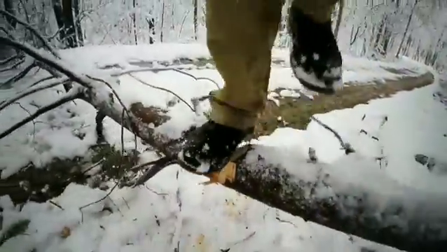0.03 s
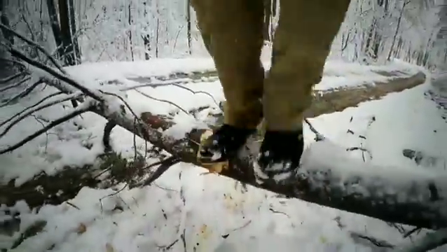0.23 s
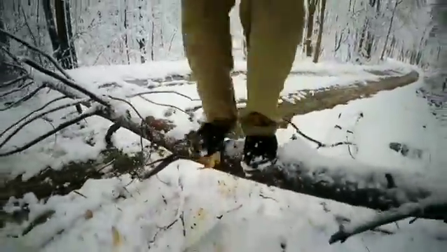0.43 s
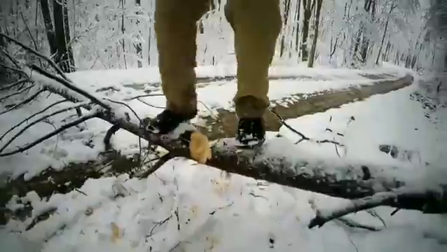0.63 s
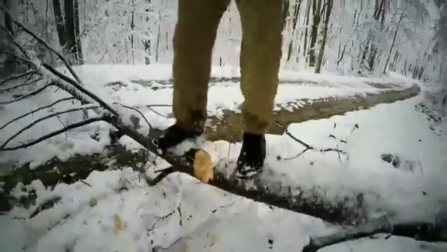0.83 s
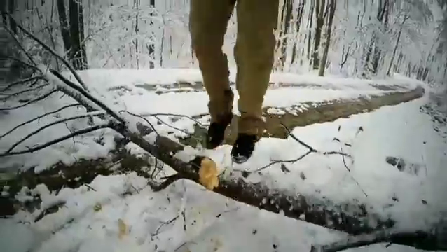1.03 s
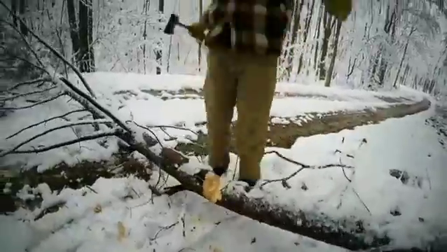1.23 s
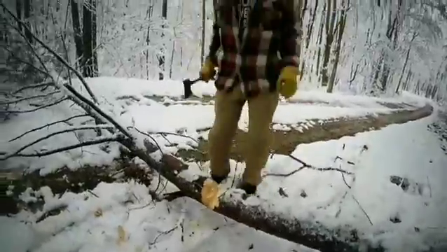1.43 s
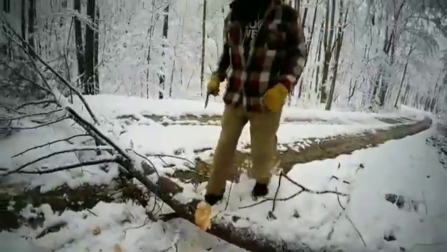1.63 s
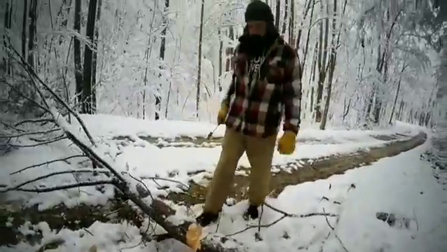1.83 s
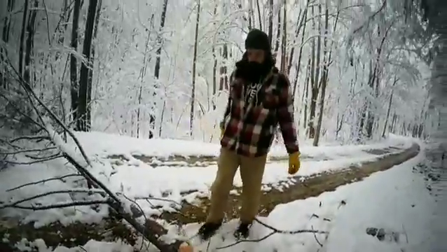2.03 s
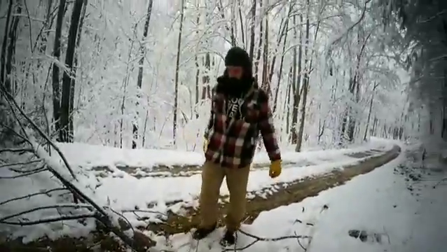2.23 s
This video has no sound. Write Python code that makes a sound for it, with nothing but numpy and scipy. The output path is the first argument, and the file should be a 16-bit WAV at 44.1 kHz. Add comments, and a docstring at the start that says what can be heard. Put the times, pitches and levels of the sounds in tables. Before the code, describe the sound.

A branch snaps loudly under boots, with smaller cracks and soft steps in snow.

```python
"""A branch snaps in the snow

A half-cut branch on a fallen tree snaps under boots in a snowy forest: one loud break, a few lesser
cracks and ticks of splinters. The trunks send back a thin echo; boots scuff on bark and press the snow.
The close hand-held microphone rumbles, takes dull bumps and overloads on the break."""
import sys
import numpy as np
from scipy import signal
from scipy.fft import rfft, irfft, next_fast_len
from scipy.io import wavfile
from scipy.ndimage import uniform_filter1d

SR = 44100
rng = np.random.default_rng(int(sys.argv[2]) if len(sys.argv) > 2 else 0)


def dump(signal):
    """Clip the signal to [-1, 1] and save it as 16-bit WAV at the path in sys.argv[1]."""
    limited = np.clip(np.atleast_2d(signal).T, -1, 1)
    pcm = np.round(limited * 32767).astype(np.int16)
    wavfile.write(sys.argv[1], SR, pcm)


N = 105840  # 2.4 s
FIBRE_RISE_S = 0.0002  # how fast the noise of tearing wood starts


def amp(db):
    """Turn decibels into a gain."""
    return 10 ** (np.asarray(db) / 20)


def unit(x):
    """Scale a signal to an average power of 1."""
    return x / np.sqrt(np.mean(x ** 2) + 1e-20)


def clock():
    """Time of each sample in seconds."""
    return np.arange(N) / SR


def curve(rows):
    """Join (time, value) points by straight lines."""
    return np.interp(clock(), *np.transpose(rows))


def noise(colour, size, tilt_db=0):
    """Noise with a colour (a level for each frequency), tilted by tilt_db per octave around 3500 Hz."""
    octave = np.log2(np.fft.rfftfreq(size, 1 / SR) + 1)
    hz, db = np.transpose(colour)
    slope_db = tilt_db * np.maximum(octave - np.log2(3500), -2)
    gain = amp(np.interp(octave, np.log2(hz + 1), db) + slope_db)
    phases = np.exp(2j * np.pi * rng.random(len(gain)))
    return unit(irfft(gain * phases, size))


def fade(t, rise, t60):
    """A quick rise, then a fall of 60 dB every t60 seconds."""
    return (1 - np.exp(-t / rise)) * np.exp(-np.log(1000) * t / t60)


def whip(t, hz, swell_s):
    """A few cycles that swell for swell_s seconds and die away."""
    return np.sin(2 * np.pi * hz * t) * t / swell_s * np.exp(.5 * (1 - (t / swell_s) ** 2))


def grain(depth_db):
    """A random gain that changes about every two milliseconds."""
    wobble = unit(uniform_filter1d(rng.standard_normal(N), size=90))
    return unit(amp(depth_db * wobble))


def add(track, s, sound):
    """Mix a sound in at s seconds."""
    part = track[max(0, round(s * SR)):][:len(sound)]
    part += sound[:len(part)]


def microphone_rumble():
    """The moving microphone makes a deep rumble."""
    # strength of the rumble: t/s, level/dB
    levels = [(0, -31.5), (.13, -26), (.19, -26), (.3, -17.5), (.43, -19.5), (.5, -22.5), (.6, -16),
              (.66, -26.5), (.76, -26.5), (.95, -32.5), (1.05, -28), (1.19, -34), (1.28, -29),
              (1.66, -26.5), (1.78, -18.5), (1.86, -26.5), (2.02, -24.5), (2.39, -27.5)]
    # colour of the rumble: f/Hz, level/dB
    colour = [(10, -5), (20, 8), (34, 0), (50, -9.5), (70, -14.5), (100, -30.5), (160, -61.5), (300, -67),
              (800, -91)]
    rumble = noise(colour, N)
    rumble /= np.sqrt(np.abs(uniform_filter1d(rumble ** 2, size=SR // 12)))  # even out chance swells
    return amp(curve(levels)) * rumble


def hand_rubbing():
    """The hand rubs on the microphone with a low noise."""
    # strength of the rubbing: t/s, level/dB
    levels = [(0, -44.5), (.3, -43.5), (.7, -44.5), (1.1, -54), (1.5, -47), (1.8, -42), (2.0, -41),
              (2.12, -45), (2.25, -44.5), (2.4, -41.5)]
    # colour of the rubbing: f/Hz, level/dB
    colour = [(30, -9.5), (75, 6.5), (110, -5), (200, -11.5), (290, -20.5), (550, -26.5), (1000, -37.5),
              (3000, -60.5)]
    return amp(curve(levels)) * noise(colour, N)


def forest_hiss():
    """The forest hisses faintly."""
    # strength of the hiss: t/s, level/dB
    levels = [(0, -53.5), (.7, -54.5), (1.1, -59.5), (1.5, -54), (1.9, -57), (2.4, -59)]
    # colour of the hiss: f/Hz, level/dB
    colour = [(150, -31), (250, -7), (589, -11), (699, -9), (774, -13.5), (1050, -11.5), (1130, -13.5),
              (1620, -12), (1760, -8.5), (2360, -12.5), (3440, -9), (5550, -17.5), (15000, -25)]
    return amp(curve(levels)) * noise(colour, N)


def splinter_ticks():
    """Small splinters and twigs give way, each with a tiny burst of noise."""
    # splinters breaking: t/s, level/dB, tilt/(dB per octave)
    ticks = [(.012, -34.5, -6), (0.131, -44, -4), (0.3353, -31, 8), (0.3387, -34, 5.5), (0.3646, -33, 12),
             (.4344, -36, 10), (0.442, -28.5, -8.5), (0.505, -39.5, 10), (0.5494, -27.5, -9),
             (0.7728, -37.5, 5.5), (0.797, -34.5, -1.5), (0.906, -29, 15), (.963, -35, 5), (0.98, -35, 4),
             (1.12, -42, 3), (1.1408, -43, -7), (1.1873, -34.5, -11), (1.278, -31.5, 2),
             (1.341, -27.5, -0.5), (1.376, -37, 6), (1.4062, -41, 5), (1.5668, -36.5, -5.5),
             (1.639, -44, 1), (1.729, -48, 10), (1.7816, -46, 5), (1.8621, -40, 4.5)]
    # colour of a tick: f/Hz, level/dB
    colour = [(200, -28), (1000, -22), (2100, -5), (2700, 4), (4400, 5), (5300, -8.5), (7000, -3.5),
              (8500, -14.5), (15000, -23.5)]
    out, t = np.zeros(N), clock()[:SR // 20]
    for s, db, tilt_db in ticks:
        add(out, s, amp(db) * noise(colour, len(t), tilt_db) * fade(t, FIBRE_RISE_S, t60=0.018))
    return out


def trunk_echo(wood):
    """Trunks scatter the sound and blur its pitch: near ones briefly, far ones with a long thin tail."""
    # colour of the echo: f/Hz, level/dB
    colour = [(200, -29.5), (600, -10.5), (1200, -14), (1850, 1), (2200, -7.5), (2650, 2), (3500, 4.5),
              (4300, -2.5), (5300, -17.5), (7000, -12), (8500, -22.5), (15000, -27.5)]
    near = amp(-22.5) * unit(fade(clock(), rise=0.009, t60=0.11))
    far = amp(-27.5) * unit(fade(clock(), rise=0.009, t60=0.74))
    power = signal.fftconvolve(wood ** 2, (near ** 2 + far ** 2) / N)[:N]
    crackle = grain(depth_db=2.5)  # the echo varies from trunk to trunk
    return np.sqrt(np.abs(power)) * crackle * noise(colour, N)


def snow_crunches():
    """Snow packs under a sole in short dull slips."""
    # slips of the snow: t/s, level/dB
    slips = [(.015, -41), (.068, -43), (0.301, -47), (.338, -43), (.359, -36), (.393, -29), (.468, -41),
             (0.545, -44), (0.68, -40), (0.69, -44), (.705, -46.5), (0.746, -42), (0.889, -23), (.901, -38),
             (0.919, -36), (1.372, -53), (1.503, -43.5), (1.518, -40), (1.535, -44.5), (1.614, -49),
             (1.694, -44), (1.7065, -42), (1.781, -41.5), (1.797, -49), (1.871, -43), (1.9087, -42),
             (1.9666, -42), (2.232, -52), (2.263, -53)]
    # colour of a crunch: f/Hz, level/dB
    colour = [(150, -9), (450, 3.5), (800, -2), (1300, -1.5), (2000, -12), (4000, -17), (12000, -33)]
    out, t = np.zeros(N), clock()[:SR // 10]
    for s, db in slips:
        add(out, s, amp(db) * noise(colour, len(t)) * fade(t, rise=0.00049, t60=0.031))
    return out


def microphone_bumps():
    """Soft knocks on the microphone, two or three low cycles each; the row at 0.877 s is instead the deep thud
    of the branch itself at the big break."""
    # knocks, and the branch's thud at 0.877 s: t/s, level/dB, f/Hz
    bumps = [(.015, -25.5, 141), (.03, -28.5, 153), (0.055, -34.5, 180), (.07, -27.5, 160),
             (0.218, -34.5, 113), (0.233, -20, 42.5), (0.288, -30.5, 172), (0.397, -12, 28.3),
             (.54, -58, 140), (0.877, -24.5, 160), (1.709, -19.5, 148), (1.78, -23.5, 142.4),
             (1.873, -24, 142), (1.907, -26.5, 165), (1.954, -17, 44), (2.076, -30, 86), (2.192, -37, 149),
             (2.23, -34, 123), (2.268, -39.5, 138.8), (2.356, -30.5, 164)]
    out, t = np.zeros(N), clock()[:SR // 4]
    for s, db, hz in bumps:
        add(out, s, amp(db) * whip(t, hz, swell_s=0.86 / hz))
    return out


def boot_scuffs():
    """Soles rub on snowy bark with a grainy noise."""
    # strokes of a sole: t/s, length/s, level/dB
    scuffs = [(0.328, .07, -47.5), (0.407, 0.073, -41), (0.766, 0.084, -44.5), (1.22, 0.19, -49.5)]
    # colour of a scuff: f/Hz, level/dB
    colour = [(240, -52.5), (400, -17), (1410, -13.5), (1610, -19), (1880, -3.5), (2220, -28.5), (2430, -3),
              (2740, -2.5), (4330, -6.5), (5430, -24), (6510, -15), (15000, -35.5)]
    rise_s, fall_s = 0.0091, 0.03
    level, t = np.zeros(N), clock()
    for s, length, db in scuffs:
        level += amp(db) * np.clip((t - s) / rise_s, 0, 1) * np.clip(1 - (t - s - length) / fall_s, 0, 1)
    return level * grain(depth_db=2) * noise(colour, N)


def branch_ring(t, crack_db):
    """The branch rings with its own tones; weaker cracks move the whole branch less, giving less bass."""
    # tones of the branch: f/Hz, level/dB, t60/s
    tones = [(315, -24.5, 0.068), (410, -23.5, 0.041), (607.7, -21.5, .03), (1093, -7, .016),
             (1243, -12.5, 0.013), (1501, -14.5, .02), (1913, -8, 0.027), (2591, -4.5, 0.034),
             (3030, -14.5, .022), (3302, -11.5, 0.049), (3610, -8, 0.027), (4119, -0.5, 0.019)]
    bass_db = 0.85 * (crack_db - 10)  # 10 dB stands for a full break
    out = np.zeros(len(t))
    for k, (hz, db, t60) in enumerate(tones):
        gain = amp(db + rng.normal(0, 1) + bass_db * (hz < 700))
        out += (-1) ** k * gain * np.sin(2 * np.pi * hz * t) * fade(t, rise=0.00062, t60=t60)
    return out


def branch_cracks():
    """Each break whips a splinter, rings the branch, tears fibres and splits with a bright click."""
    # breaks: t/s, level/dB, splinter f/Hz, splinter swell/s, ring/dB, fibres/dB, fibre t60/s,
    # fibre tilt/(dB per octave), split/dB; ring, fibres and split are relative to the level
    cracks = [(0.3818, -5.5, 6500, 0.00028, -42, -11, 0.0055, -4.5, -14.5),
              (.382, -3, 4430, 0.00062, -13.5, -7, 0.021, -4.5, -33),
              (.8781, 9, 2675, 0.0019, -3.5, -0.5, 0.019, -3.5, -20),
              (0.9385, -6.5, 6100, 0.00043, -30, -1, 0.011, 3, -10),
              (0.9453, -2, 2676, 0.0014, -4.5, -7, 0.032, -0.9, -16),
              (0.948, -6, 1862, 0.0014, -21, -22, .015, -.5, -30),
              (1.3036, -30, 7400, 0.0011, -24, -6, 0.022, 1, -8),
              (1.3085, -23.5, 3960, 0.00095, -22, -2, 0.019, 2.5, -14),
              (1.3151, -14.5, 2870, 0.0016, -4, -24, 0.015, 10, -32),
              (1.3158, -2, 3920, 0.00087, -15.5, -17, 0.025, 1, -36),
              (1.3195, -14, 4050, 0.00056, -28, 3, 0.0063, -0.5, -30)]
    # colour of tearing fibres: f/Hz, level/dB
    fibre_colour = [(100, -18), (400, -19.5), (800, -7.5), (1100, -3), (1800, -8.5), (2150, -23.5),
                    (2700, 7.5), (4500, 6.5), (5300, -3.5), (6300, 2.5), (7400, -2), (8200, -13.5),
                    (9000, -6.5), (11000, -12), (12300, -14.5), (15000, -14)]
    # colour of the split: f/Hz, level/dB
    split_colour = [(500, -17), (5000, -10), (9000, -2), (11000, 0), (12300, -5), (14000, -2.5),
                    (15000, -6)]
    out, t = np.zeros(N), clock()[:SR // 10]
    for s, db, hz, swell_s, ring_db, fibre_db, fibre_t60, tilt_db, split_db in cracks:
        splinter = whip(t, hz, swell_s)
        ring = amp(ring_db) * branch_ring(t, db)
        fibres = amp(fibre_db) * noise(fibre_colour, len(t), tilt_db) * fade(t, FIBRE_RISE_S, fibre_t60)
        split = amp(split_db) * noise(split_colour, len(t)) * fade(t, FIBRE_RISE_S, t60=0.0037)
        add(out, s, amp(db) * (splinter + ring + fibres + split))
    return out


def scene():
    """Mix the breaking wood, its echo, the boots and the background into one channel."""
    wood = branch_cracks() + splinter_ticks()
    echo = trunk_echo(wood)
    boots = boot_scuffs() + snow_crunches()
    background = microphone_bumps() + microphone_rumble() + hand_rubbing() + forest_hiss()
    return (wood + echo + boots + background)[None]


def record(dry):
    """The recorder flattens the loudest peaks and cuts off the highest treble."""
    hardness, top_hz = 30, 15250
    clipped = dry / (1.5 + np.abs(dry) ** hardness) ** (1 / hardness)
    size = next_fast_len(N + SR // 10)
    treble_cut = 1 / np.sqrt(1 + (np.fft.rfftfreq(size, 1 / SR) / top_hz) ** 160)
    return irfft(rfft(clipped, size) * treble_cut, size)[:, :N]


dry = scene()
out = record(dry)
dump(out)
```